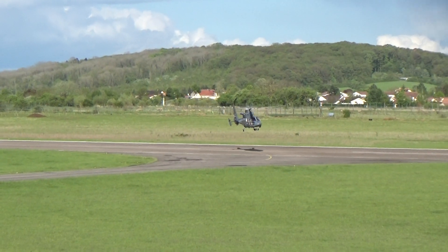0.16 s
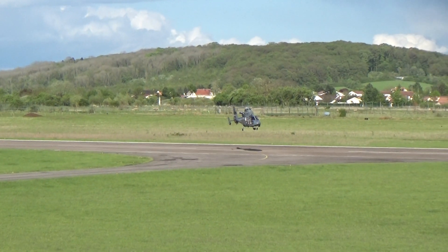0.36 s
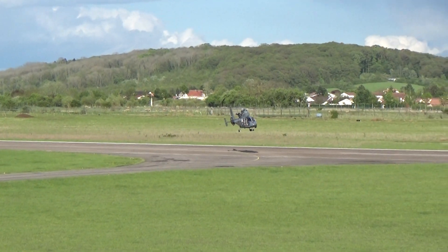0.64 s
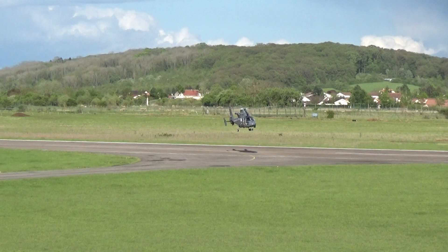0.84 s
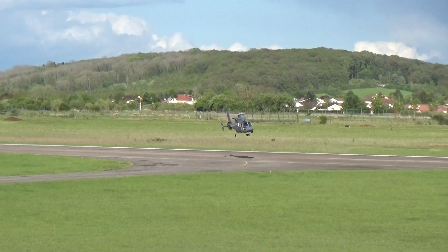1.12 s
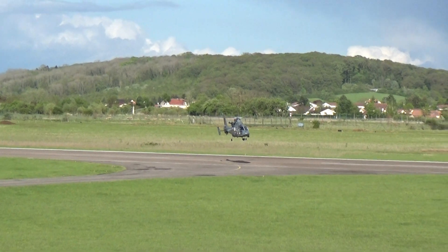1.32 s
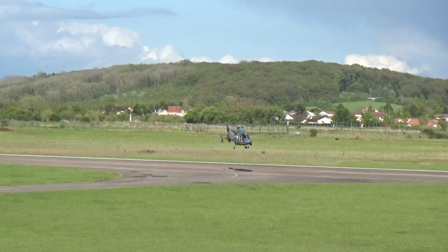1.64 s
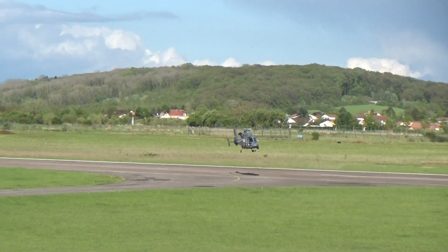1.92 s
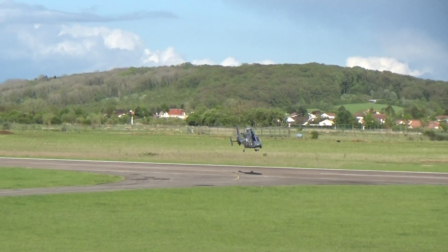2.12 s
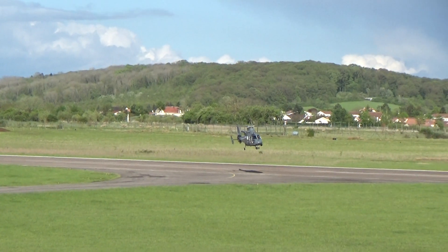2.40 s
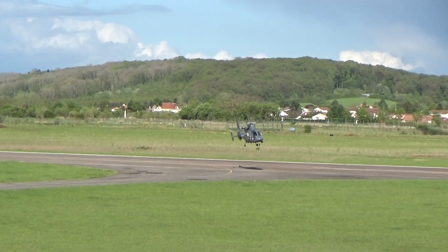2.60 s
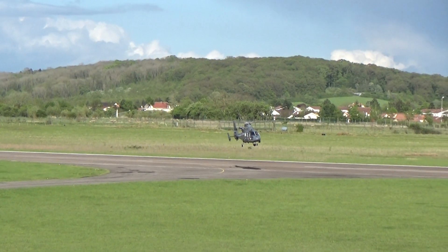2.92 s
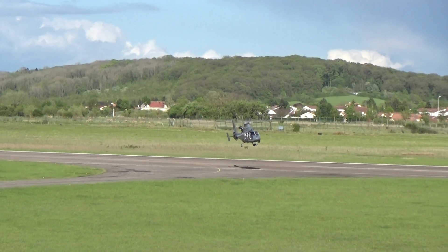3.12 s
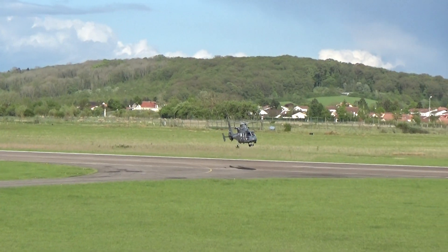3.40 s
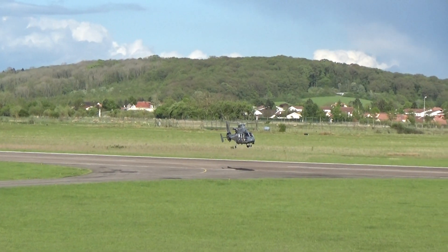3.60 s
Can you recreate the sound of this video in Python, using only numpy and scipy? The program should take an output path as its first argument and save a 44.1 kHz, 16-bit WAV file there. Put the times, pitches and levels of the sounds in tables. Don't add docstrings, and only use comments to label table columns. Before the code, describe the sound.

A hovering helicopter beats rapidly in the distance while gusts of wind thump the microphone.

```python
import sys
import numpy as np
from scipy import signal
from scipy.fft import rfft, irfft
from scipy.io import wavfile
from scipy.ndimage import uniform_filter1d

SR = 44100
rng = np.random.default_rng(int(sys.argv[2]) if len(sys.argv) > 2 else 0)


def decibels_to_gain(level_db):
    exponent = np.asarray(level_db, float) / 20
    return 10 ** exponent


def store_pcm(level_fs):
    pcm = np.round(np.clip(level_fs, -1, 1) * 32767).astype(np.int16)
    wavfile.write(sys.argv[1], SR, np.atleast_2d(pcm).T)


N = 165375
T = np.arange(N) / SR

# time_s, level_db, beat_over_roar_db
ARRIVAL = [(0, -44.5, 10.5), (.22, -43.5, 11), (.35, -43, 2), (.6, -43, 11.5), (.9, -40, 13.5),
           (1.25, -40.5, 10.5), (1.5, -43, 9), (1.7, -44.5, 13), (1.9, -42.5, 8.5), (2.1, -40, 6),
           (2.5, -42.5, 8.5), (2.75, -41.5, 4.5), (3.1, -46.5, 7.5), (3.4, -50, 7.5), (3.6, -50, 8.5),
           (3.75, -48, 7.5)]
# freq_hz, density_db
ROAR_SPECTRUM = [(35, -37), (60, -6), (114, 2.5), (146, -2.5), (551, -9.5), (1010, -7.5), (1810, -20),
                 (2160, -19), (4160, -36.5), (5410, -72), (9150, -120)]
# freq_hz, density_db
SWISH_SPECTRUM = [(180, -29), (350, 3.5), (750, -2.5), (1100, -5.5), (1550, -11), (2300, -14), (3300, -23),
                  (4300, -46.5)]
# start_s, peak_db, top_pitch_hz, climb_s
SLAPS = [(.617, -19, 950, .014), (.662, -15, 950, .009), (.705, -17, 820, .005), (.747, -13, 830, .003),
         (.788, -15, 830, .004), (.875, -24, 800, .003), (.913, -24, 520, .004), (.955, -26, 750, .003),
         (.996, -25, 520, .003), (1.037, -25, 600, .004), (1.163, -26, 770, .003)]
# freq_hz, width_hz, level_over_arrival_db, strongest_s
WHINE = [(699, 16, -15, 0.85), (1046.6, 26, -11.5, 2.05), (1016, 75, -12, .15), (1037, 80, -14, 2.4),
         (1430, 70, -15, 1), (1664, 23, -18.5, 0.67), (1836, 400, -15, 1.62), (2138, 74, -14, 2.76),
         (2161, 38, -19.5, 0.64), (2796, 230, -24.5, 0.99), (3135, 110, -28, 0.29), (3192, 120, -30, 2.1),
         (3233, 100, -30, 2.7), (4220, 200, -33, 1.6)]
# start_s, length_s, level_db, centre_hz
GUSTS = [(0.0, 0.094, -38, 260), (0.111, 0.021, -21, 206), (0.256, 0.037, -29.5, 300),
         (0.294, 0.21, -25.5, 173), (0.53, 0.13, -30.5, 212), (0.787, 0.027, -26, 110),
         (1.048, 0.018, -23, 150), (1.189, 0.035, -22, 173), (1.251, 0.052, -17.5, 176),
         (1.31, 0.17, -29, 148), (1.433, 0.179, -20, 167), (1.666, 0.043, -23, 213),
         (1.754, 0.12, -23, 143), (1.895, 0.13, -30, 182), (2.009, 0.047, -30, 130),
         (2.276, .24, -23.5, 242), (2.57, 0.032, -41, 151), (2.693, 0.021, -35, 210),
         (2.766, 0.068, -25, 124), (2.821, 0.076, -17, 336), (2.907, .22, -18.5, 427),
         (3.151, .24, -26.5, 324), (3.43, 0.062, -31.5, 342), (3.491, 0.023, -30.5, 356),
         (3.546, 0.069, -33.5, 280), (3.668, 0.026, -45.5, 334), (3.707, 0.029, -27.5, 330)]
# centre_s, peak_db, pitch_hz
EDDIES = [(0.059, -21.5, 130.5), (0.135, -12.5, 231), (0.153, -18, 98), (0.284, -18.5, 272),
          (0.333, -6.5, 167), (0.377, -13.5, 187), (0.4, -17, 174), (0.423, -21, 240), (0.468, -16, 194),
          (0.565, -21, 219), (0.666, -13.5, 275), (0.835, -21.5, 153), (1.081, -15.5, 153),
          (1.211, -16, 217), (1.272, -9, 178), (1.287, -19, 204), (1.396, -22, 197), (1.438, -19, 152.6),
          (1.462, -7.5, 170.3), (1.496, -7, 131.4), (1.523, -12, 302), (1.552, -25, 162), (1.582, -20, 177),
          (1.608, -14.5, 183), (1.689, -16.5, 222), (1.781, -11.5, 254), (1.805, -20, 136),
          (1.831, -12.5, 159.5), (1.849, -14, 118.7), (1.918, -25, 187), (1.938, -13.5, 227),
          (1.985, -10.5, 210), (2.054, -29, 170), (2.08, -20, 200), (2.131, -20.5, 115),
          (2.298, -12.5, 176), (2.313, -17, 196), (2.338, -12, 294), (2.366, -10, 286), (2.405, -18.0, 225),
          (2.447, -20, 163), (2.483, -24, 265), (2.504, -19.5, 315), (2.786, -20, 198),
          (2.809, -12.0, 146.5), (2.831, -24.5, 196), (2.849, -12.5, 263), (2.874, -1, 293),
          (2.923, -22.5, 370), (2.96, -10.5, 407), (2.976, -4.5, 370), (3.018, -14.5, 315),
          (3.034, -12.5, 428), (3.078, -15.0, 400), (3.102, -9.5, 414), (3.138, -15, 393),
          (3.173, -18.5, 360), (3.677, -18.5, 373), (3.714, -21.5, 278)]
# start_s, length_s, level_db, top_pitch_hz
CHIRPS = [
    (.165, .058, -63, 5700),
    (2.199, .045, -54, 5800),
    (3.336, .04, -68, 5600),
]
# start_s, peak_db, pitch_hz
TICKS = [(.115, -57, 6500), (.276, -57, 6500), (.39, -54, 7500), (.629, -53, 7300), (.693, -57, 7200),
         (2.582, -60, 9500), (2.836, -44, 1500), (2.864, -42, 2300), (2.886, -48, 2500), (2.931, -61, 5500),
         (3.02, -42, 1400), (3.045, -58, 4500), (3.068, -37, 1900), (3.107, -46, 1500), (3.478, -54, 7500),
         (3.607, -55, 7800), (3.629, -59, 7150), (3.679, -54, 7250), (3.709, -58, 7500)]
# freq_hz, density_db
HISS_SPECTRUM = [(4000, -21.5), (5000, -3), (5900, -3.5), (7000, -1), (8500, -7.5), (10500, -9),
                 (13000, -6.5), (16500, -19)]
# freq_hz, density_db
SIDE_HISS_SPECTRUM = [(4500, -26), (5500, -13), (7000, -17), (10000, -19), (11000, -24), (11800, -50)]
# freq_hz, level_db
CIRCUIT = [(13119, -92), (13248, -97), (15625, -96)]
# freq_hz, left_minus_right_db
PORT_TILT = [(60, -1.0), (110, -1.5), (190, 0.5), (350, 3), (630, 1.0), (1140, 1), (2060, 2), (3710, 0.5)]
# freq_hz, left_lead_rad
PORT_LEAD = [(0, 0), (3880, 0.0034)]
# freq_hz, level_db
PORT_OWN = [(100, -31.5), (1000, -23), (4000, -25)]

BLADE_HZ, FIRST_BLADE_S = 23.98, -.0045
BEAT_RISE_S, BEAT_FALL_S, BEAT_SPREAD_DB = 0.003, 0.013, 0.96
ROAR_DB, SWISH_DB, AIR_CUT_HZ = 6.5, -1, 4440
WHINE_SWELL_DB, WHINE_SWELL_S = 6.0, .22
WHINE_BEAT_SHARE = .4
SLAP_S, SLAP_START_SHARE, SLAP_GAIN_DB = 0.010, 0.3, -9.5
SLAP_ROUGH_SHARE, SLAP_WIDTH_HZ = .45, 1000
GROUND_LAG_S, GROUND_SHARE, GROUND_CUT_HZ = .0038, .75, 700
GROUND_AT_S, GROUND_SPAN_S = 0.84, 0.58
BREEZE_DB, BREEZE_HZ = -37.5, 130
GUST_EDGE_S, GUST_TAIL_SHARE = 0.019, 0.08
WIND_DB, LUMPS_DB, WIND_CUT_HZ = -2.5, 2, 1650
BELOW_DB_OCT, ABOVE_DB_OCT = 3, 12.5
EDDY_GAIN_DB, EDDY_CYCLES, EDDY_ROUGH_SHARE = -3, 1.32, .25
HISS_DB, HISS_FADE_DB_S = -68.5, 1.0
FILTER_ON_S, FILTER_FADE_S, FILTER_HZ, FILTER_LEAK_SHARE = 2.85, 0.14, 136, .07
DUCK_SHARE, DUCK_ABOVE_DB, DUCK_RELEASE_DB_S = 0.35, -23.5, 87.5
PORT_TOP, RECORDER_TOP = .36, .42


def in_time(rows):
    s, *cols = np.transpose(rows)
    return [np.interp(T, s, c) for c in cols]


def at_hz(points, hz):
    p = np.array(points, float)
    return np.interp(np.log(hz), np.log(p[:, 0]), p[:, 1])


def rms_one(x):
    return x / np.sqrt(np.mean(x ** 2) + 1e-20)


def drift(rate_hz):
    r = np.exp(-80 * np.pi * rate_hz / SR)
    white = rng.standard_normal(N // 40 + 2002)
    slow = signal.lfilter([1], [1, -2 * r, r * r], white)[2000:]
    return np.interp(np.arange(N) / 40, np.arange(len(slow)), rms_one(slow))


def bands(gain_db, low_hz, high_hz, patchy_db, rate_hz):
    edges_hz = low_hz * 2 ** np.arange(0, np.log2(high_hz / low_hz), 1 / 3)
    white = rng.standard_normal((2, N + 4000))
    out = np.zeros(N)
    for k, (a, b) in enumerate(zip(edges_hz, edges_hz[1:])):
        sos = signal.butter(2, [a, b], "band", fs=SR, output="sos")
        band = signal.sosfilt(sos, white[k % 2])[-N:]
        out += band * decibels_to_gain(gain_db(np.sqrt(a * b)) + patchy_db * drift(rate_hz))
    return out


def add(out, start_s, sound):
    i = int(start_s * SR)
    out[i:i + len(sound)] += sound[:N - i]


def resonance(x, hz, width_hz):
    r = np.exp(-np.pi * width_hz / SR)
    a = [1, -2 * r * np.cos(2 * np.pi * hz / SR), r * r]
    return signal.lfilter([1, 0, -1], a, signal.lfilter([1 - r], a, x))


def low_pass(x, hz):
    return signal.sosfilt(signal.butter(5, hz, fs=SR, output="sos"), x)


def helicopter():
    level_db, beat_db = in_time(ARRIVAL)
    beat = blade_beat()
    roar = rms_one(bands(lambda hz: at_hz(ROAR_SPECTRUM, hz), 57.84, 6500, 2.0, 6.0))
    swish = rms_one(bands(lambda hz: at_hz(SWISH_SPECTRUM, hz), 256.2, 6500, 2.5, 12.0))
    rotor = decibels_to_gain(ROAR_DB - 0.58 * beat_db) * roar + decibels_to_gain(SWISH_DB + beat_db) * beat * swish
    out = decibels_to_gain(level_db) * (rotor + whine(beat))
    return low_pass(ground(out + slaps()), AIR_CUT_HZ)


def blade_beat():
    turns = (T - FIRST_BLADE_S) * BLADE_HZ
    since_s = turns % 1 / BLADE_HZ
    blade = np.floor(turns).astype(int) + 1
    beat = (1 - np.exp(-(since_s / BEAT_RISE_S) ** 2)) * np.exp(-since_s / BEAT_FALL_S)
    return beat / beat.max() * decibels_to_gain(BEAT_SPREAD_DB * rng.standard_normal(100)[blade])


def whine(beat):
    out = np.zeros(N)
    for hz, width_hz, db, s in WHINE:
        swell_db = WHINE_SWELL_DB * np.exp(-((T - s) / WHINE_SWELL_S) ** 2)
        line = rms_one(resonance(rng.standard_normal(N), hz, width_hz))
        out += decibels_to_gain(db + 2.2 * drift(6.0) + swell_db) * line
    return out * (1 - WHINE_BEAT_SHARE / 3 + WHINE_BEAT_SHARE * beat)


def slaps():
    out, t = np.zeros(N), np.arange(int(5 * SLAP_S * SR)) / SR
    for s, db, hz, climb_s in SLAPS:
        pitch_hz = hz * (1 - (1 - SLAP_START_SHARE) * np.exp(-(t / climb_s) ** 2))
        u = t / (SLAP_S / 3 + climb_s / 2)
        tone = np.sin(2 * np.pi * (np.cumsum(pitch_hz) / SR + rng.random()))
        rough = rms_one(resonance(rng.standard_normal(len(t)), hz, SLAP_WIDTH_HZ))
        slap = u * np.exp(1 - u) * (tone + SLAP_ROUGH_SHARE * rough)
        add(out, s - .002, decibels_to_gain(db + SLAP_GAIN_DB) * slap)
    return out


def ground(x):
    lag = np.exp(-2j * np.pi * np.fft.rfftfreq(N, 1 / SR) * GROUND_LAG_S)
    dull = signal.lfilter(*signal.butter(1, GROUND_CUT_HZ, fs=SR), x)
    share = GROUND_SHARE * np.exp(-((T - GROUND_AT_S) / GROUND_SPAN_S) ** 2)
    return x + share * irfft(rfft(dull) * lag, N)


def wind():
    return low_pass(PORT_TOP * np.tanh((gusts() + eddies()) / PORT_TOP), WIND_CUT_HZ)


def gusts():
    power = np.full(N, decibels_to_gain(2 * BREEZE_DB))
    log_hz = power * np.log2(BREEZE_HZ)
    for s, length_s, db, hz in GUSTS:
        rise = (T - s) / GUST_EDGE_S
        fall = (s + length_s - T) / (GUST_EDGE_S + GUST_TAIL_SHARE * length_s)
        blow = decibels_to_gain(2 * db) * np.clip(np.minimum(rise, fall) + .5, 0, 1) ** 2
        power = power + blow
        log_hz = log_hz + blow * np.log2(hz)
    centre = log_hz / power

    def shape_db(hz):
        octaves = np.log2(hz) - centre
        below_db = BELOW_DB_OCT * np.minimum(octaves, 0)
        above_db = ABOVE_DB_OCT * np.maximum(octaves, 0) ** 1.06
        return below_db - above_db - 3 * centre

    noise = rms_one(bands(shape_db, 17.45, 4000, 1.68, 24.0))
    return np.sqrt(power) * decibels_to_gain(WIND_DB + LUMPS_DB * drift(26.0)) * noise


def eddies():
    out = np.zeros(N)
    for s, db, hz in EDDIES:
        cycles = np.arange(-2 * SR // hz, 2 * SR // hz) * hz / SR
        thump = np.sin(2 * np.pi * (cycles + rng.random()))
        rough = rms_one(resonance(rng.standard_normal(len(cycles)), 2 * hz, 2 * hz))
        shape = np.exp(-(2 * cycles / EDDY_CYCLES) ** 2)
        add(out, s - 2 / hz, decibels_to_gain(db + EDDY_GAIN_DB) * shape * (thump + EDDY_ROUGH_SHARE * rough))
    return out


def bird():
    out = np.zeros(N)
    for s, length_s, db, hz in CHIRPS:
        u = np.linspace(0, 1, int(length_s * SR))
        pitch_hz = hz * np.interp(u, [0, .75, 1], [.89, 1, .96])
        tone = np.sin(2 * np.pi * np.cumsum(pitch_hz) / SR)
        add(out, s, decibels_to_gain(db - 2.0) * np.sin(np.pi * u) ** 1.1 * tone)
    return out


def ticks():
    out, t = np.zeros(N), np.arange(1200) / SR
    for s, db, hz in TICKS:
        burst = rng.standard_normal(len(t)) * np.exp(-t / .005)
        low_mode = rms_one(resonance(burst, hz, .5 * hz))
        high_mode = rms_one(resonance(burst, 1.5 * hz, .5 * hz))
        tick = low_mode + .5 * high_mode
        add(out, s, decibels_to_gain(db + 3) * tick / np.abs(tick).max())
    return out


def hiss():
    common = bands(lambda hz: at_hz(HISS_SPECTRUM, hz), 3870, 20600, 0.9, 6.0)
    apart = bands(lambda hz: at_hz(SIDE_HISS_SPECTRUM, hz), 4600, 14000, 3.0, 8.0)
    scale = decibels_to_gain(HISS_DB - HISS_FADE_DB_S * T) / common.std()
    return scale * common, scale * apart


def circuit():
    out = np.zeros(N)
    for hz, db in CIRCUIT:
        out += decibels_to_gain(db + 2.5 * drift(1.5)) * np.sqrt(2) * np.sin(2 * np.pi * hz * T)
    return out


def ports(x):
    hz = np.maximum(np.fft.rfftfreq(N, 1 / SR), 1)
    half = decibels_to_gain(at_hz(PORT_TILT, hz) / 2) * np.exp(.5j * at_hz(PORT_LEAD, hz))
    own = decibels_to_gain(at_hz(PORT_OWN, hz)) * np.exp(-2j * np.pi * hz * .03) * np.cos(hz / 97.)
    return irfft(rfft(x) * np.array([half + own, 1 / half - own]), N)


def scene():
    common, apart = hiss()
    near = ports(helicopter() + wind() + ticks() + common + circuit())
    return near + apart * [[1], [-1]] + bird() * decibels_to_gain([[1.5], [-2.0]])


def roll_off(x):
    return signal.sosfilt(signal.butter(12, 16520, fs=SR, output="sos"), x)


def record(dry):
    cut = signal.sosfilt(signal.butter(4, FILTER_HZ, "high", fs=SR, output="sos"), dry)
    on = np.sin(np.pi / 2 * np.clip((T - FILTER_ON_S) / FILTER_FADE_S, 0, 1)) ** 2
    x = dry + (1 - FILTER_LEAK_SHARE) * on * (cut - dry)
    level_db = 10 * np.log10(uniform_filter1d(x.mean(0) ** 2, size=600) + 1e-12)
    release_db = DUCK_RELEASE_DB_S * T
    held_db = np.maximum.accumulate(level_db + release_db) - release_db
    over_db = uniform_filter1d(np.maximum(held_db - DUCK_ABOVE_DB, 0), size=300)
    x = x * decibels_to_gain(3.0 - DUCK_SHARE * over_db)
    mix = RECORDER_TOP * np.tanh(x / RECORDER_TOP)
    return roll_off(mix)


dry = scene()
out = record(dry)
store_pcm(out)
```